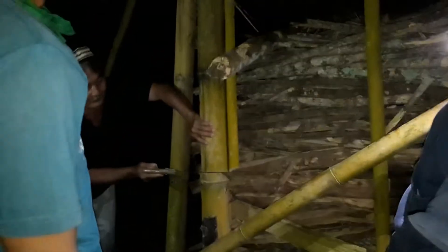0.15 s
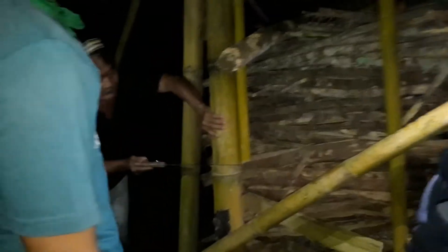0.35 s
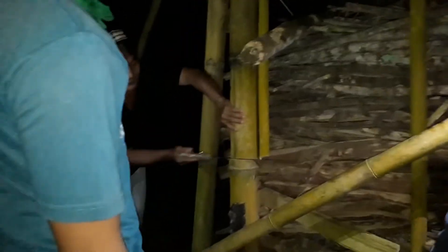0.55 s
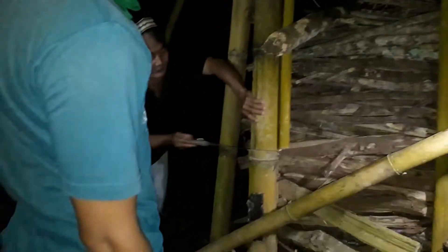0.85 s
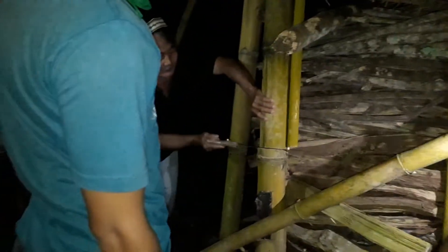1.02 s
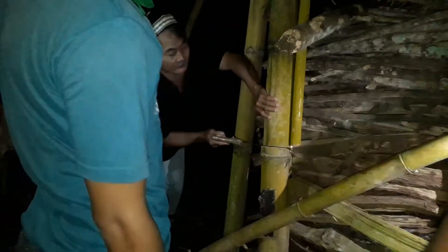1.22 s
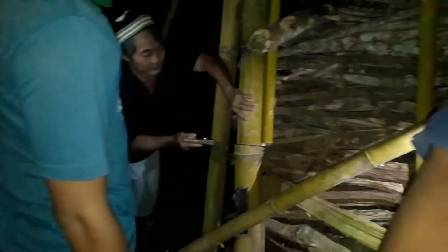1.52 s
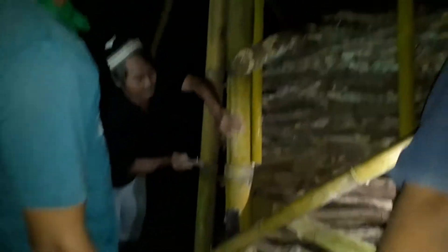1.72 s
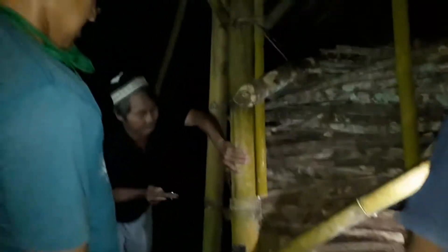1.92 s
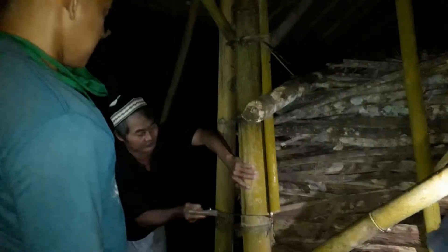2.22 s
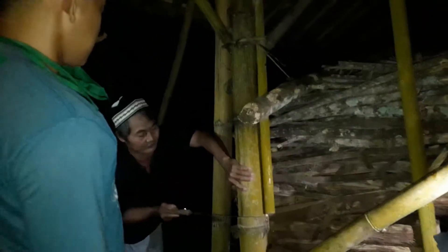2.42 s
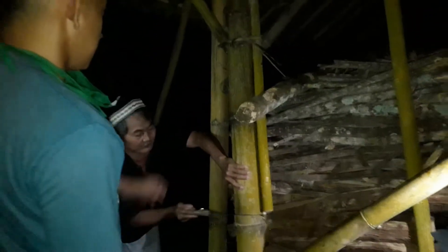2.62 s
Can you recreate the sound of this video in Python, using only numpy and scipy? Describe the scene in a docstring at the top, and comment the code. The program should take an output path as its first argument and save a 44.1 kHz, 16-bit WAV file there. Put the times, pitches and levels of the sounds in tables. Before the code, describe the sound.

A hand saw rasps into a bamboo pole in quick strokes, with faint crickets behind.

```python
"""A hand saw rasps into a standing bamboo pole: five strokes, a hesitant pause, four more.
The teeth tear fibres and set the cane's wall and the air inside it ringing. The blade knocks as it
turns in the cut, snags, jolts the pole and chatters when pushed hard. It is night, outdoors:
a hut wall close by answers the saw, and crickets trill faintly behind it."""
import sys
import numpy as np
from scipy import signal
from scipy.fft import rfft, irfft, next_fast_len
from scipy.io import wavfile
from scipy.ndimage import uniform_filter1d, map_coordinates

SR = 44100
rng = np.random.default_rng(int(sys.argv[2]) if len(sys.argv) > 2 else 0)


def dump(signal):
    """Clip the signal to [-1, 1] and save it as 16-bit WAV at the path in sys.argv[1]."""
    limited = np.clip(np.atleast_2d(signal).T, -1, 1)
    pcm = np.round(limited * 32767).astype(np.int16)
    wavfile.write(sys.argv[1], SR, pcm)


N = 121275

# saw strokes: fastest t/s, rise/s, fall/s, level/dB, hiss send/dB, hollow send/dB, hollow f/Hz,
# shudder send/dB
SAW_STROKES = [(.138, 0.091, 0.057, -36.5, 2, -0.5, 904, -23),
               (.293, .07, .075, -28, -0.5, -4.5, 798, -27.5),
               (.522, 0.093, 0.065, -25.5, 0, -2.5, 890, -25),
               (.735, 0.098, .06, -26.5, 1.5, -4.5, 850, -23.5),
               (0.939, 0.08, 0.041, -24.5, 1, -8.5, 894, -27), (1.406, .08, .04, -45, 2, 6, 827.3, -13),
               (1.502, 0.034, 0.054, -44, 3.5, 7, 822, -13.5),
               (1.868, .049, .04, -26.5, 4.5, -5.5, 798.5, -29), (2.01, .08, .06, -46.5, 2, 0, 765, -16),
               (2.191, 0.06, 0.044, -27, -0.5, -4.5, 771.6, -29),
               (2.342, 0.073, 0.068, -27.5, -1, -5, 714, -24),
               (2.568, 0.076, 0.054, -26.5, -1, -6.5, 784, -21)]
# shrill scrapes on the cane's hard skin: middle t/s, half length/s, level/dB
SKIN_SCRAPES = [(.765, 0.0087, -28.5), (1.494, .006, -42), (1.868, 0.013, -27)]
# booms from deep in the cut: middle t/s, half length/s, level/dB
BOOM_SWELLS = [(2.222, 0.019, -34), (2.503, 0.024, -31), (2.578, 0.018, -30.5)]
# blade knocks: t/s, level/dB, snap send/dB
BLADE_KNOCKS = [(.128, -32, -8), (.213, -35, 2.5), (.222, -44, 5.5), (.262, -35.5, 5), (.325, -31.5, -8),
                (.371, -45.5, 6.5), (.418, -39, -5), (.475, -34.5, -1.5), (.625, -35, -11),
                (.657, -26.5, -7.5), (.75, -33, 3), (.965, -25.5, -5), (1.026, -42, -6), (1.037, -35, -2.5),
                (1.081, -44, 2), (1.126, -38, -12), (1.428, -39.5, -10), (1.488, -40.5, -5),
                (1.524, -46, -15), (1.737, -43, -5), (1.744, -46, -1), (1.807, -37, 3), (1.826, -34, -5),
                (1.881, -32.5, -15), (1.912, -34.5, -10), (1.96, -47, 1.5), (2.114, -42, 2),
                (2.263, -36, 5.5), (2.305, -28, 6), (2.488, -31.5, -5), (2.527, -33.5, 2), (2.6, -31, -1),
                (2.659, -38.5, -0.5), (2.668, -40, 3), (2.677, -38, -5)]
# snagging teeth: t/s, level/dB
TOOTH_SNAGS = [(.213, -36), (.625, -25), (1.037, -28.5), (1.428, -31.5), (2.263, -47), (2.309, -21.5)]
# jolts of the pole: t/s, f/Hz, level/dB
POLE_THUDS = [(.213, 237, -49), (0.327, 341.7, -34.5), (0.96, 182.6, -41), (1.037, 230, -45.5),
              (1.488, 409, -44), (2.355, 314, -36.5)]
# blade chatter: middle t/s, half length/s, level/dB
CHATTER_SWELLS = [(0.33, 0.0092, -28), (0.713, 0.029, -24.5), (1.882, .005, -24.5), (2.171, 0.014, -25),
                  (2.208, 0.0077, -36.5), (2.311, .012, -24), (2.354, 0.019, -21.5), (2.55, 0.012, -28)]

# modes of the cane wall: f/Hz, width/Hz, level/dB
WALL_MODES = [(177, 27, -18.5), (319, 34, 2), (436, 16.7, -0.5), (468, 20.5, 4.5), (972, 150, -11),
              (1552, 119, 6.5), (1702, 195, -4), (2080, 143, 8), (2347, 130, 0.5), (2633, 170, 5.5),
              (2792, 103, 3.5), (3327, 137, 5), (3653, 390, 0.5)]
# modes of the air column: multiple of the hollow pitch, width/Hz, level/dB
AIR_MODES = [(0.939, 133, 6.5), (1.099, 120, 2.5), (1.24, 107, -1.5)]
# the air column's booming mode: f/Hz, width/Hz, level/dB
BOOM_MODE = [(755, 40, 0)]
# modes of a snagged tooth: f/Hz, width/Hz, level/dB
TOOTH_MODES = [(3340, 690, -3), (5300, 1100, -1.5), (7450, 300, 1), (9400, 1300, -2), (12040, 1700, 5.5),
               (14200, 1400, 6)]
# modes of the blade: f/Hz, width/Hz, level/dB
BLADE_MODES = [(1726, 78, -11.5), (2260, 106, -9.5), (2516, 37, 5.5), (2729, 48, 4.5), (3715, 35, -8),
               (5200, 490, -19), (7500, 140, -21)]

# broad rasp of the cane: f/Hz, level/dB
RASP_EQ = [(40, -21), (100, -21), (200, -3.5), (550, -5.5), (750, -5.5), (1250, -3.5), (2300, 4.5),
           (3600, -1), (5000, -8.5), (9000, -19), (16000, -26.5)]
# bright hiss of fibres: f/Hz, level/dB
HISS_EQ = [(1500, -53), (3500, -11), (5000, 4), (6500, -1.5), (8000, -4.5), (9500, -5), (11000, -15),
           (15500, -11)]
# shrill edge of a scrape: f/Hz, level/dB
SCRAPE_EQ = [(2500, -29), (3400, 6.5), (5200, 6.5), (6400, 1.5), (7600, -3.5), (10000, -10.5),
             (16000, -45.5)]
# low shudder of the pole: f/Hz, level/dB
SHUDDER_EQ = [(20, -15), (40, -14), (70, -11), (130, 2.5), (200, 7), (400, -3), (1000, -18), (4000, -78)]
# crisp top of a knock: f/Hz, level/dB
SNAP_EQ = [(700, -6), (2500, -39), (4000, 2.5), (6000, 7), (9000, 4), (13000, -2), (16000, -2)]
# still night air: f/Hz, level/dB
NIGHT_EQ = [(25, -15), (60, -11), (140, -2), (250, -4), (420, -4.5), (560, -17), (800, -11), (1300, -14.5),
            (2500, -19), (5000, -17.5), (9000, -28), (16000, -33)]

# decay of the yard's reflections: f/Hz, t60/s
YARD_DECAY = [(200, 0.55), (900, 0.21), (3000, 0.19), (12000, 0.18)]
# cricket voices: f/Hz, spread/Hz, level/dB, trill rate/Hz
CRICKET_BANDS = [(3480, 310, -63.5, 69), (3920, 630, -64, 49), (4760, 480, -75.5, 140),
                 (7000, 250, -73.5, 90)]


def sawing(slowest=.35, edge_db=14.5, drag_db=-13, drag_spread=1.33, hiss_trim_db=-11):
    """Each stroke speeds up and slows down, driving tooth rate and loudness; a light drag outlasts it."""
    t = np.arange(N) / SR
    speed, pushes = np.full(N, slowest), []
    for peak_s, rise, fall, db, *_ in SAW_STROKES:
        away = np.where(t < peak_s, (peak_s - t) / rise, (t - peak_s) / fall)
        curve = np.where(t < peak_s, 1.9, 2.5)  # eases in, stops more squarely
        bite = amp(-edge_db * np.minimum(away, 10) ** curve)
        drag = amp(drag_db - edge_db * (away / drag_spread) ** 2)
        pushes.append(amp(db) * (bite + drag))
        speed = np.maximum(speed, np.sqrt(bite))
    grit = teeth(speed, tear_s=0.00097, rub_db=4.5)
    air_drive = teeth(speed, tear_s=0.00043, rub_db=4)
    hollow, hiss_env, shudder_env = np.zeros((3, N))
    for push, (*_, hiss_db, hollow_db, hz, shudder_db) in zip(pushes, SAW_STROKES):
        hollow += air_column(air_drive * push * amp(hollow_db), hz)
        hiss_env += push * amp(hiss_db)
        shudder_env += push * amp(shudder_db)
    hiss = amp(hiss_trim_db) * filtered(grit * hiss_env, eq(HISS_EQ))
    scrapes = filtered(grit * swells(SKIN_SCRAPES), eq(SCRAPE_EQ))
    shudder = filtered(rng.standard_normal(N) * shudder_env, eq(SHUDDER_EQ))
    return hollow + cane_wall(grit * sum(pushes)) + hiss + scrapes + shudder


def teeth(speed, tear_s, rub_db, full_speed_hz=750, grip_db=1.38, grip_hz=120):
    """Each tooth tears fibres in a short burst, over plain rubbing; the grip wavers."""
    bites = ticks(full_speed_hz * speed, jitter=0.33, scatter_db=3.5)
    tearing = signal.lfilter([1], [1, -np.exp(-1 / (tear_s * SR))], bites) / np.sqrt(speed)
    friction = (unit(tearing) + amp(rub_db)) * rng.standard_normal(N)
    return unit(friction * amp(grip_db * wobble(grip_hz)))


def cane_wall(force, ring_db=-5, rasp_db=-6.5):
    """The wall answers a force with woody modes and a broad rasp."""
    return filtered(force, amp(ring_db) * body(WALL_MODES) + amp(rasp_db) * eq(RASP_EQ))


def air_column(force, hz, level_db=-4):
    """The air inside the cane rings hollow around a given pitch."""
    return amp(level_db) * resonate(force, [(hz * ratio, width, db) for ratio, width, db in AIR_MODES])


def booms():
    """Late strokes drive one mode of the air column hard."""
    return swells(BOOM_SWELLS) * resonate(rng.standard_normal(N), BOOM_MODE)


def knocks(knock_db=6.5, knock_t60=0.066, snap_db=2.5, snap_t60=0.037):
    """The blade strikes the side of the cut: a woody knock, a hollow ring and a bright snap."""
    wall_hits = sum(burst(s, db + knock_db, knock_t60) for s, db, _ in BLADE_KNOCKS)
    air_hits = sum(burst(s, db + knock_db, knock_t60) for s, db, _ in BLADE_KNOCKS)
    snaps = sum(burst(s, db + snap_db + send_db, snap_t60) for s, db, send_db in BLADE_KNOCKS)
    return cane_wall(wall_hits) + air_column(air_hits, hz=870) + filtered(snaps, eq(SNAP_EQ))


def snags():
    """A tooth catches and springs free with a steely click."""
    clicks = sum(burst(s, db, t60=0.024, attack_s=0.00072) for s, db in TOOTH_SNAGS)
    return filtered(clicks, body(TOOTH_MODES))


def thuds(t60=0.2, attack_s=0.0025, lower_ratio=0.91, lower_db=-4):
    """The blade jolts the pole, which rings dully in a close pair of low modes."""
    out = np.zeros(N)
    for start_s, hz, db in POLE_THUDS:
        t = np.maximum(np.arange(N) / SR - start_s, 0)
        phase = 2 * np.pi * hz * t
        pair = np.sin(phase) + amp(lower_db) * np.sin(lower_ratio * phase + rng.uniform(0, 2 * np.pi))
        out += pair * amp(db - 60 * t / t60) * (1 - np.exp(-t / attack_s))
    return out


def chatter(slip_hz=105, slip_sigma_s=.0019, sustain=.45):
    """Pushed hard, the blade sticks and slips, squeaking in quick bursts."""
    lag = np.arange(-SR // 100, SR // 100) / SR
    pulse = np.exp(-.5 * (lag / slip_sigma_s) ** 2)
    slips = signal.fftconvolve(ticks(slip_hz, jitter=.22, scatter_db=2), pulse, "same")
    ring = filtered(rng.standard_normal(N), body(BLADE_MODES))
    # flatten the ring's level so that the slips set the rhythm
    ring /= np.sqrt(np.abs(uniform_filter1d(ring ** 2, size=300)) + 1e-9)
    return swells(CHATTER_SWELLS) * unit(ring * (slips + sustain))


def yard(x, wet_db=-12.5):
    """The hut wall and the ground scatter back a short tail, longest in the lows."""
    hz, t, noise = signal.stft(rng.standard_normal(SR // 2), SR, nperseg=256)
    decay = amp(-60 * t / along(YARD_DECAY, hz)[:, None])
    tail = signal.istft(noise * decay, SR, nperseg=256)[1]
    impulse = np.pad(tail, (SR // 250, 0)) / np.linalg.norm(tail)  # 4 ms pre-delay
    return amp(wet_db) * signal.fftconvolve(x, impulse)[:N]


def night(air_db=-58, trill_depth=0.15):
    """A bed of still air and distant crickets, each voice a noise band with a drifting tremolo."""
    t = np.arange(N) / SR
    bed = amp(air_db) * filtered(rng.standard_normal(N), eq(NIGHT_EQ))
    for hz, spread, db, trill_hz in CRICKET_BANDS:
        song = filtered(rng.standard_normal(N), np.exp(-2 * ((grid() - hz) / spread) ** 2))
        trill = 1 + trill_depth * np.sin(2 * np.pi * trill_hz * t + wobble(5.36))
        bed += amp(db) * unit(song * trill)
    return bed


def burst(start_s, db, t60, attack_s=0.00067):
    """A brief crunch of contact noise."""
    t = np.arange(SR // 8) / SR
    crunch = rng.standard_normal(len(t)) * (1 - np.exp(-t / attack_s)) * amp(db - 60 * t / t60)
    return np.pad(crunch, (round(start_s * SR), N))[:N]


def ticks(rate_hz, jitter, scatter_db):
    """Impulses of uneven size and spacing; jitter is a share of one cycle."""
    cycles = np.cumsum(rate_hz * np.ones(N)) / SR
    timing, size = rng.standard_normal((8192, 2))[:int(cycles[-1])].T
    onsets = np.searchsorted(cycles, np.arange(len(timing)) + jitter * timing)
    return np.bincount(np.minimum(onsets, N - 1), amp(scatter_db * size), N)


def swells(rows):
    """An envelope of rounded swells."""
    t = np.arange(N) / SR
    return sum(amp(db) * np.exp(-.5 * np.abs((t - middle) / half) ** 3) for middle, half, db in rows)


def wobble(rate_hz):
    """A smooth random curve, rate_hz knots a second."""
    return map_coordinates(rng.standard_normal(4096), [np.arange(N) * rate_hz / SR], mode="wrap")


def resonate(x, modes):
    """Ring x through parallel resonators of alternating polarity, normalised by their summed power."""
    ring = sum((-1) ** k * amp(db) * signal.lfilter(*signal.iirpeak(hz, hz / width, SR), x)
               for k, (hz, width, db) in enumerate(modes))
    return ring / np.sqrt(sum(amp(db) ** 2 * np.pi * width / SR for _, width, db in modes))


def body(modes):
    """Unit-power response of a set of resonances."""
    f = grid()
    return unit(sum((-1) ** k * amp(db) * 1j * f * width / (hz * hz - f * f + 1j * f * width)
                    for k, (hz, width, db) in enumerate(modes)))


def eq(points):
    """Minimum-phase, unit-power response through (f/Hz, level/dB) points."""
    cepstrum = irfft(np.log(amp(along(points, grid()))))
    half = len(cepstrum) // 2
    cepstrum[1:half] *= 2
    cepstrum[half + 1:] = 0
    return unit(np.exp(rfft(cepstrum)))


def filtered(x, response):
    """x through a frequency response given on the grid."""
    size = 2 * (len(response) - 1)
    return irfft(rfft(x, size) * response, size)[:N]


def grid():
    """The filters' frequencies in Hz."""
    return np.fft.rfftfreq(2 * next_fast_len(N // 2 + SR // 8), 1 / SR)


def along(points, hz):
    """Interpolate (f/Hz, value) points on a log frequency axis."""
    f, values = np.transpose(points)
    return np.interp(np.log(hz + 1), np.log(f + 1), values)


def amp(db):
    """Decibels to gain."""
    return 10 ** (np.asarray(db) / 20)


def unit(x):
    """Scale to rms 1."""
    return x / np.sqrt(np.mean(np.abs(x) ** 2) + 1e-20)


def scene():
    """The saw up front, the yard around it, the night behind, in mono."""
    saw = sawing() + booms() + knocks() + snags() + thuds() + chatter()
    return (saw + yard(saw) + night())[None]


def record(dry):
    """A brick-wall low-pass at 16 kHz trims the top of the mix."""
    return filtered(dry[0], grid() < 16000)[None]


dry = scene()
out = record(dry)
dump(out)
```